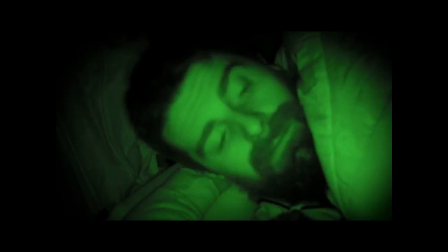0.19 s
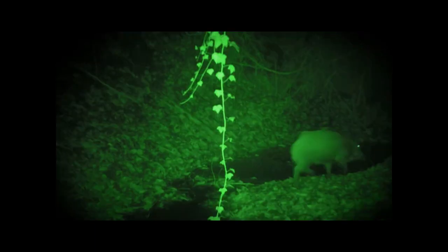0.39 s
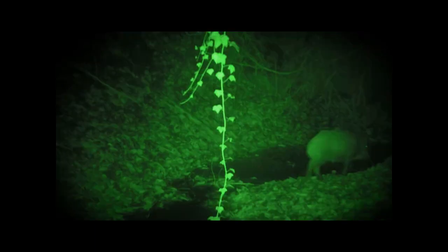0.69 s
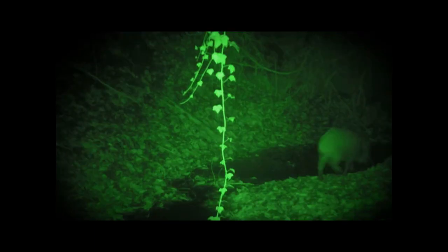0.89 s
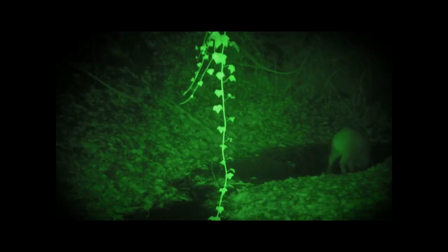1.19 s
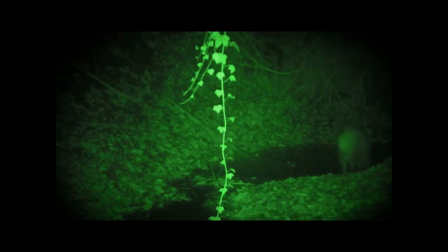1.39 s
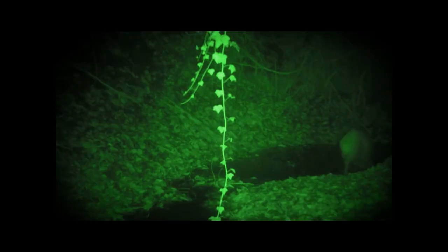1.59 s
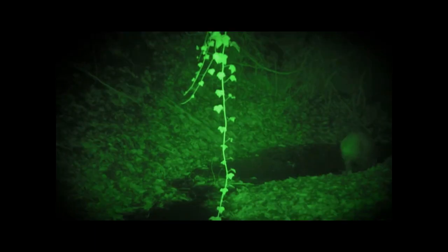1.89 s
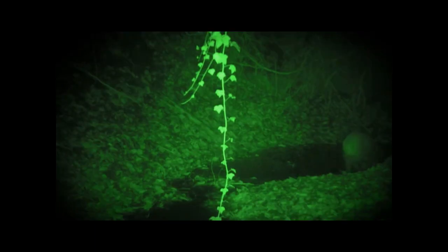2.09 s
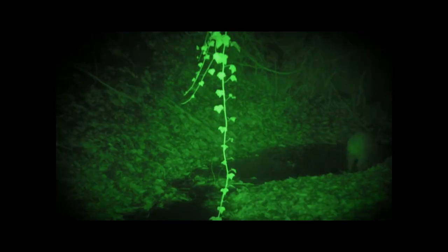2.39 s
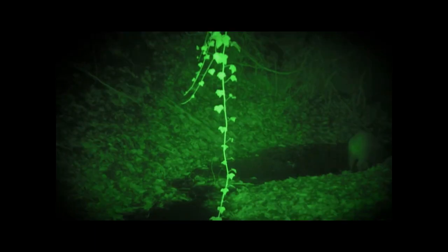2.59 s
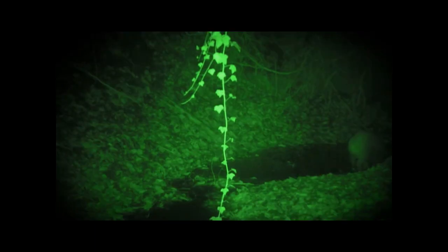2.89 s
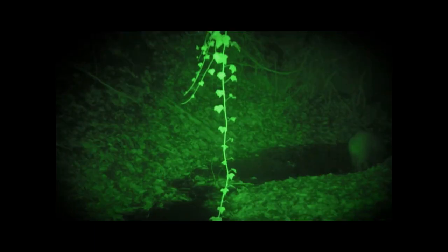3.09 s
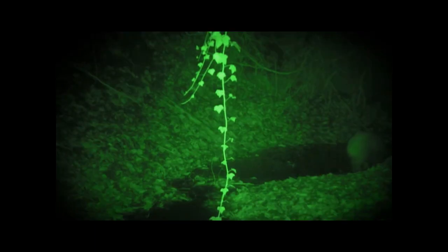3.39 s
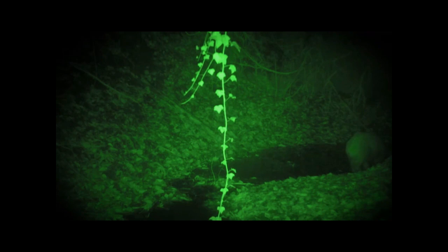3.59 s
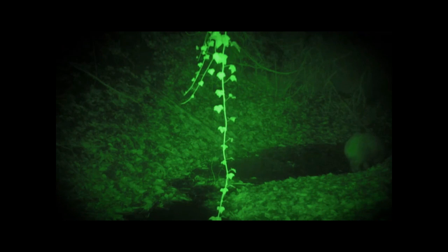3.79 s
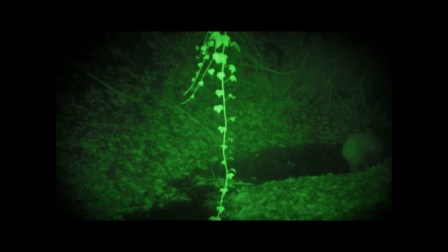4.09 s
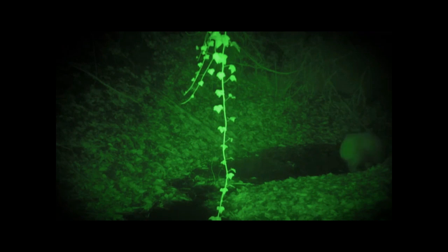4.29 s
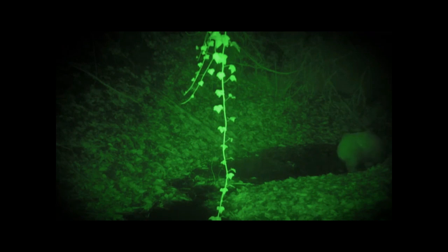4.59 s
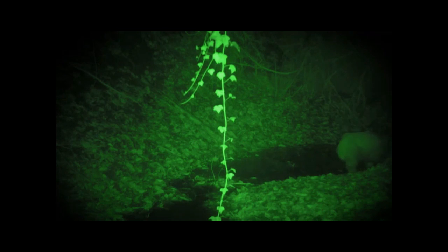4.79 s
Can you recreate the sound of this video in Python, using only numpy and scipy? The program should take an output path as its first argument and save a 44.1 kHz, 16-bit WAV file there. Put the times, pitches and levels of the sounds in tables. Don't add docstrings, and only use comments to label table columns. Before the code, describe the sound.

A boar forages in deep dry leaf litter, heard from a few metres by a camera microphone with little echo. Soft handling ticks come first, then muffled hoof rustles and small thuds, then loud irregular crackles, crushed heaps and snapping twigs. Brief, low closed-throat grunts sit underneath; airy nostril noise follows late. A thin high whine and low night air continue throughout.

```python
import sys
import numpy as np
from scipy import signal
from scipy.fft import rfft, irfft, next_fast_len
from scipy.io import wavfile
from scipy.ndimage import map_coordinates

SR = 44100
rng = np.random.default_rng(int(sys.argv[2]) if len(sys.argv) > 2 else 0)


def generate_wav(signal):
    frames = np.transpose(np.atleast_2d(signal))
    scaled = np.clip(frames, -1, 1) * 32767
    pcm = np.round(scaled).astype(np.int16)
    wavfile.write(sys.argv[1], SR, pcm)


def gain_from_db(level_db):
    decades = np.asarray(level_db, float) / 20
    return 10 ** decades


N = 218293


def unit(x):
    return x / np.sqrt(np.mean(x ** 2) + 1e-20)


def curves(rows):
    s, *cols = np.transpose(rows)
    return [np.interp(np.arange(N) / SR, s, c) for c in cols]


def wobble(rate_hz):
    knots = rng.standard_normal(int(N * rate_hz / SR) + 4)
    return map_coordinates(knots, [np.arange(N) * rate_hz / SR])


def filtered(x, response):
    m = next_fast_len(len(x) + 8192)
    return irfft(rfft(x, m) * response(np.fft.rfftfreq(m, 1 / SR)), m)[:len(x)]


def coloured(x, points):
    point_hz, db = np.transpose(points)
    hz = np.fft.rfftfreq(4096, 1 / SR)
    gain = gain_from_db(np.interp(np.log(hz + 1), np.log(point_hz), db))
    cepstrum = irfft(np.log(gain))
    cepstrum[1:2048] *= 2
    cepstrum[2049:] = 0
    impulse = irfft(np.exp(rfft(cepstrum)))
    return signal.fftconvolve(x, impulse)[:N]


def resonance(hz, width_hz):
    return lambda f: 1j * f * width_hz / (hz * hz - f * f + 1j * f * width_hz)


def rings(events, gain_db):
    out, t = np.zeros(N + SR), np.arange(SR // 10) / SR
    for start_s, peak_db, hz, cycles in events:
        attack = 1 - np.exp(-t * hz * 4)
        ring = np.sin(2 * np.pi * hz * t) * np.exp(-3 * t * hz / cycles) * attack
        out[round(start_s * SR):][:len(t)] += gain_from_db(peak_db + gain_db) * ring
    return out[:N]


# hz, level_db (per Hz)
NIGHT_COLOUR = [(15, -6), (30, -15), (60, -5), (120, -3), (250, -3.5), (500, -43), (900, -120)]


def night():
    rise_db = np.interp(np.arange(N) / SR, [.1, .3], [-5, 0])
    level_db = -64.0 + rise_db + 0.78 * wobble(16)
    return gain_from_db(level_db) * unit(coloured(rng.standard_normal(N), NIGHT_COLOUR))


# time_s, level_db
WHINE_LEVEL = [(0, -75), (.27, -75), (.45, -67), (4.95, -67)]


def whine():
    carrier_hz, field_hz = 7796.2, 59.51
    t = np.arange(N) / SR
    flip = np.tanh(5 * np.sin(np.pi * field_hz * t))
    return np.sqrt(2) * gain_from_db(curves(WHINE_LEVEL)[0]) * flip * np.sin(2 * np.pi * carrier_hz * t)


# start_s, tick_db, thump_db
OPENING_TICKS = [
    (0.231, -33.5, -50),
    (0.2404, -29.5, -31.5),
    (0.25, -42, -52),
]


def opening_ticks():
    out, t = np.zeros(N), np.arange(SR // 25) / SR
    for start_s, tick_db, thump_db in OPENING_TICKS:
        rattle = 0.48 * rng.standard_normal(len(t)) * np.exp(-t / 0.0006)
        spike = -1.6 * np.exp(-t / .00006)
        push = -gain_from_db(thump_db + 9.0) * (1 - t / 0.0064) * np.exp(-t / 0.0006)
        out[round(start_s * SR):][:len(t)] += gain_from_db(tick_db) * (rattle + spike) + push
    burst_db = np.interp(np.arange(N) / SR, [.222, .228, .241, .247], [-90, -40, -39, -90])
    return out + gain_from_db(burst_db) * filtered(rng.standard_normal(N), resonance(600, 1200))


# start_s, length_s, pitch_hz, level_db, width_hz
SNIFFS_AND_RUSTLES = [(4.21, .15, 2180, -47, 120), (4.07, .06, 2150, -48, 110), (4.31, .06, 4000, -58, 200),
                      (4.73, .06, 2160, -52, 110), (4.57, .03, 2500, -46, 200), (4.28, .06, 450, -52, 170),
                      (4.445, .04, 310, -53, 170), (3.55, .05, 340, -48, 170), (4.17, .3, 2250, -46, 1100),
                      (4.55, .3, 2300, -48.5, 1100)]


def sniffs_and_rustles():
    out = np.zeros(N)
    for start_s, length_s, hz, level_db, width_hz in SNIFFS_AND_RUSTLES:
        noise = rng.standard_normal(round(length_s * SR))
        air = filtered(noise, lambda f: resonance(hz, width_hz)(f) ** 2)
        out[round(start_s * SR):][:len(air)] += gain_from_db(level_db) * unit(air) * signal.windows.tukey(len(air), .25)
    return out


# time_s, pitch_hz, level_db
GRUNTS = [
    [(1.785, 80.8, -52), (1.81, 80.7, -41), (1.845, 73.3, -40), (1.885, 63.5, -54)],
    [(2.786, 81.4, -43), (2.824, 84.2, -42.5), (2.855, 84, -39), (2.915, 82, -54)],
    [(4.036, 85, -52), (4.05, 83, -46), (4.09, 73.6, -49), (4.16, 64.3, -50), (4.19, 59.4, -54)],
]
# centre_hz, width_hz, gain_db
THROAT = [(77.5, 21, 0.5), (197, 200, -3), (273, 140, 2.5)]


def grunts():
    def throat(f):
        return sum(gain_from_db(gain_db) * resonance(hz, width_hz)(f) ** 2 for hz, width_hz, gain_db in THROAT)

    out = np.zeros(N)
    for rows in GRUNTS:
        on = slice(round(rows[0][0] * SR), round(rows[-1][0] * SR))
        pitch_hz, level_db = (c[on] for c in curves(rows))
        cycle = np.floor(np.cumsum(pitch_hz * (1 + .03 * wobble(70)[on])) / SR)
        pulse_db = 6 * (cycle % 2) + 1.2 * rng.standard_normal(len(pitch_hz))
        pulses = np.diff(cycle, prepend=0) * gain_from_db(pulse_db)
        breath = .02 * rng.standard_normal(len(pitch_hz))
        voice = filtered(pulses + breath, throat)
        out[on] += gain_from_db(level_db) * unit(voice) * signal.windows.tukey(len(voice), .35)
    return out


# start_s, peak_db, pitch_hz
THUDS = [(.052, -45, 250), (1.79, -29.5, 200), (4.044, -40, 270), (4.07, -47, 250), (4.155, -40, 290),
         (2.822, -32, 350), (1.862, -37, 170), (.503, -23.5, 520), (0.429, -46, 84), (1.02, -48, 100),
         (1.143, -50, 57), (.247, -40, 110), (1.642, -51, 88), (1.715, -36, 480), (1.7, -42, 70),
         (1.8, -39, 280), (2.822, -28, 600), (2.847, -20.5, 570)]


def thuds():
    falls = rings([(s, db, hz, 2.5) for s, db, hz in THUDS], 6.5)
    return filtered(falls, lambda f: (1j * f / (45 + 1j * f)) ** 2)


# start_s, peak_db, pitch_hz, ring_cycles
SNAPS = [(0.364, -23, 1140, 7.3), (1.101, -20, 1110, 2.6), (1.166, -20, 1160, 2.8), (1.39, -19, 1100, 2.5),
         (1.568, -24, 1020, 2.4), (1.715, -13, 1190, 1.5), (1.807, -15, 940, 2.3), (1.823, -17, 1530, 2.4),
         (1.973, -24, 1470, 5.8), (2.025, -22, 990, 2.1), (2.097, -21, 1230, 4.4), (2.229, -15, 2700, 12),
         (2.286, -17, 1290, 4.3), (2.366, -12, 1890, 2.5), (2.393, -18, 1740, 3.1), (2.825, -17, 1650, 3.1),
         (3.011, -15.5, 1560, 1.4), (3.043, -16, 1380, 3.8), (3.412, -6.5, 1580, 2), (3.439, -15, 2080, 4),
         (3.478, -19, 1350, 2.7), (3.598, -16.5, 1560, 4.3), (3.775, -20, 1690, 4.4),
         (4.046, -16.5, 1360, 3.2), (4.401, -19, 885, 3), (4.465, -24, 1440, 2.9)]
# start_s, peak_db, pitch_hz, ring_cycles
TICKS = [(.5005, -16, 1000, 6), (1.8658, -13, 1650, 2.3), (2.8492, -16, 1830, 1.4), (3.2195, -6, 1300, 1.1),
         (3.2625, -14, 2300, 4.5), (4.0695, -14.5, 2020, 2.4), (1.625, -13, 1080, 2),
         (1.891, -49, 12000, 1.5), (1.953, -32, 5000, 3), (1.978, -37, 9500, 1.5),
         (2.017, -25.5, 4700, 2.5), (2.018, -40, 10500, 1.8), (2.112, -29, 12300, 4),
         (2.158, -31, 12300, 4), (2.242, -38, 4600, 3), (2.365, -36, 4900, 3), (2.497, -28, 4500, 3),
         (2.541, -33, 8500, 2.7), (2.561, -37, 10000, 2.5), (2.814, -41, 10000, 2.8),
         (3.107, -34, 10000, 2.3), (3.413, -28, 5130, 7.1), (3.44, -29, 4900, 4), (3.549, -46, 6000, 2.5),
         (3.58, -37, 8300, 10), (3.863, -29, 5870, 10), (4.03, -42.5, 4700, 3), (4.507, -29, 2900, 5.6),
         (3.205, -26, 2290, 30), (.041, -37, 2500, 6.3)]


def snaps():
    def twig_body(f):
        delay = np.exp(-2j * np.pi * f * 0.00125)
        return resonance(1800, 5000)(f) / (1 + 1j * f / 6000) * delay

    twigs = filtered(rings(SNAPS, 3.4), twig_body)
    direct = filtered(twigs + rings(TICKS, 1.9), lambda f: (1j * f / (250 + 1j * f)) ** 2)
    ground_echo = 0.22 * np.pad(direct, (130, 0))[:N]
    return direct + ground_echo


# start_s, peak_db, pitch_hz
CRACKS = [(0.5046, -30, 1060), (0.6587, -26, 1020), (1.4715, -23, 1180), (1.4983, -21, 1560),
          (1.701, -25, 1657), (1.7047, -28, 1640), (1.7883, -18, 1170), (1.8188, -15.5, 1260),
          (1.953, -15, 1750), (2.0497, -26, 1100), (2.1137, -21, 1760), (2.1677, -18, 1700),
          (2.2337, -12, 2000), (2.2376, -8.5, 2100), (2.2485, -12, 1660), (2.2813, -15, 1180),
          (2.3136, -17, 1470), (2.317, -17, 1220), (2.3824, -18, 2070), (2.4108, -15, 1960),
          (2.4249, -9, 2560), (2.4348, -14, 1830), (2.452, -17, 1480), (2.4715, -20, 1600),
          (2.4904, -14.5, 1500), (2.6272, -16, 2420), (2.6833, -16, 1650), (2.7181, -20, 1700),
          (2.7338, -18, 1910), (2.7495, -17, 2220), (2.7831, -18, 2640), (2.8562, -12, 2120),
          (2.8691, -19, 1540), (2.9018, -31, 1950), (2.9415, -19, 2360), (2.9596, -18, 2490),
          (2.9638, -13.5, 2680), (3.0899, -22, 1250), (3.1083, -22, 1850), (3.1168, -25, 1800),
          (3.1207, -24, 1890), (3.2691, -21, 1330), (3.2991, -20, 1450), (3.3161, -21, 2570),
          (3.3451, -13.5, 1550), (3.495, -23, 1540), (3.5055, -24, 1400), (3.5589, -19, 1820),
          (3.5683, -23, 1750), (3.5892, -13, 1780), (3.8266, -20, 1140), (3.8424, -12, 2630),
          (3.856, -24, 1600), (3.864, -24, 1920), (4.0766, -19, 1880), (4.1273, -20, 2320),
          (4.3571, -20, 2500), (4.6311, -18, 1230), (4.6584, -17, 1740), (4.7891, -23, 2330)]
# start_s, peak_db, pitch_hz
CRISPS = [(0.466, -38, 4230), (0.5048, -35, 4080), (0.5087, -33, 4100), (1.0363, -26, 4030),
          (1.1, -32, 4270), (1.4097, -33, 4210), (1.7993, -28, 4160), (1.8183, -29, 4280),
          (2.1024, -29, 4710), (2.1125, -21, 4650), (2.116, -20, 4700), (2.1879, -38, 4120),
          (2.4859, -31, 4294), (2.5012, -23, 4710), (2.5453, -36, 4460), (2.6271, -31, 4316),
          (2.6828, -31, 4030), (2.6913, -28, 4270), (2.7149, -25, 4430), (2.7365, -32, 4370),
          (2.7433, -29, 4480), (2.7653, -34, 4480), (2.7826, -36, 4110), (2.8265, -36, 5050),
          (2.8374, -36, 4210), (2.8502, -15, 4060), (2.8547, -19, 4120), (3.0001, -40, 4160),
          (3.0844, -33, 4660), (3.1097, -23, 4300), (3.1279, -27, 4240), (3.1705, -32, 4720),
          (3.239, -25, 4400), (3.2545, -36, 4140), (3.2796, -38, 4550), (3.3245, -23, 4380),
          (3.3417, -27, 4150), (3.3731, -35, 4330), (3.5689, -34, 4510), (3.5998, -30, 4180),
          (3.6245, -32, 4100), (3.8582, -30, 4190), (3.8937, -35, 4350), (4.0469, -38, 4090),
          (4.4004, -35, 4420), (4.6532, -34, 4120), (4.804, -44, 4550), (4.871, -40, 4320)]
# start_s, peak_db, pitch_hz
SPECKS = [(1.7794, -57, 10960), (1.8243, -53, 10000), (2.0789, -57, 8800), (2.1009, -52, 9670),
          (2.1789, -49, 9650), (2.2588, -46, 9940), (2.4358, -46, 10020), (2.5228, -48, 11290),
          (2.5308, -48, 9570), (2.5963, -53, 9300), (2.7841, -50, 10400), (2.8343, -52, 9010),
          (2.9177, -45, 11570), (3.0425, -57, 8810), (3.0845, -50, 10250), (3.1138, -39, 9920),
          (3.1339, -40, 9900), (3.1506, -47, 11470), (3.4134, -48, 10740), (3.4408, -37, 9720),
          (3.4446, -44, 9670), (3.508, -49, 11150), (3.6273, -51, 9770), (3.7851, -54, 10940),
          (3.9552, -57, 9190), (4.3846, -55, 9800), (4.5081, -44, 9940), (4.6094, -54, 10900),
          (4.8038, -59, 10520), (4.8814, -56, 11330)]


def crackles():
    def family(rows, cycles, gain_db, dull_hz):
        pieces = rings([(*row, cycles) for row in rows], gain_db)
        return filtered(pieces, lambda f: 1j * f / (450 + 1j * f) / (1 + 1j * f / dull_hz) ** 2)

    cracks = family(CRACKS, cycles=3.2, gain_db=3.5, dull_hz=3500)
    crisps = family(CRISPS, cycles=4.2, gain_db=4, dull_hz=6500)
    return cracks + crisps + family(SPECKS, cycles=4.2, gain_db=5, dull_hz=16000)


# start_s, peak_db, centre_hz, t60_s
CRUSHES = [(.328, -27, 795, 0.08), (.362, -17.5, 636, 0.063), (0.446, -25, 1330, .09),
           (.5, -14, 800, 0.071), (.636, -29.5, 816, 0.32), (0.793, -33, 850, 0.091),
           (1.099, -21.5, 1080, 0.091), (1.166, -20, 1150, 0.063), (1.391, -20, 1100, 0.096),
           (1.568, -22, 800, 0.23), (1.7, -23, 1220, 0.12), (1.911, -18.5, 940, 0.06),
           (2.108, -16.5, 1500, 0.11), (2.23, -12, 2410, 0.11), (2.379, -23, 1760, 0.14),
           (2.601, -20.5, 2520, 0.12), (2.47, -16, 1900, 0.13), (2.847, -15.5, 1900, 0.12),
           (2.96, -21, 1450, 0.029), (3.045, -24, 1220, 0.032), (3.219, -14.5, 794, 0.049),
           (3.262, -15.5, 1290, 0.038), (3.412, -11.5, 1500, 0.037), (3.439, -17, 2070, 0.045),
           (3.495, -19, 1480, 0.08), (3.567, -19.5, 1760, 0.12), (3.825, -22, 934, 0.051),
           (3.842, -20, 1410, 0.091), (4.045, -18, 1500, 0.034), (4.651, -18, 1900, 0.04),
           (2.277, -15, 1250, .25)]


def crushes():
    out, t = np.zeros(N + SR), np.arange(SR // 8) / SR
    for start_s, peak_db, hz, t60_s in CRUSHES:
        def heap(f):
            return resonance(hz, .9 * hz)(f) * resonance(1600, 4000)(f) / (1 + 1j * f / 5500) ** 3

        spray = rng.standard_normal(len(t)) * rng.random(len(t)) ** 1.6
        decay = gain_from_db(peak_db - 9 - 60 * t / max(t60_s, .01))
        attack = 1 - np.exp(-t / 0.0008)
        out[round(start_s * SR):][:len(t)] += decay * attack * unit(filtered(spray, heap))
    return out[:N]


def hush():
    dip_db, t = np.zeros(N), np.arange(N) / SR
    for start_s, peak_db, *_ in CRUSHES:
        depth_db = max(7.5 + 4 * peak_db, 0)
        dip_db -= depth_db * np.interp(t - start_s, [-.028, -.012, -.0005, .001], [0, 1, 1, 0], 0, 0)
    return gain_from_db(dip_db)


# time_s, level_db, dryness (0 deep damp layer, 1 brittle top)
LITTER = [(0, -53.5, 0.02), (.21, -56.5, 0.03), (.28, -48, 0.16), (.42, -42, 0.16), (.64, -44, 0),
          (.88, -40, 0.47), (1.3, -46.5, 0.01), (1.7, -45.5, 0.5), (2.03, -42.5, 0.45), (2.2, -44, 0.19),
          (2.6, -36, 0.95), (3.02, -42.5, 0.67), (3.3, -40, 0.68), (3.7, -39, 0.69), (3.96, -42, 0.68),
          (4.3, -45.5, 0.37), (4.55, -45, 0.54), (4.95, -43.5, 0.8)]
# peak_s, peak_db, rise_s, fall_s (each
# over 10 dB), crispness_db
STEPS = [(.238, -39.5, 0.01, 0.0078, -2), (.325, -35.5, 0.063, 0.13, -2.5), (.452, -35, 0.013, 0.049, 1),
         (.476, -32.5, 0.025, 0.014, -5), (0.507, -28.5, 0.0091, 0.018, -1), (.54, -37, 0.063, 0.062, 1),
         (.655, -43, 0.04, 0.044, 1), (.803, -41, 0.01, 0.017, 3), (1.042, -33, 0.028, 0.034, -7),
         (1.105, -32.5, 0.013, 0.04, -1), (1.18, -38.5, 0.016, 0.047, -5), (1.228, -30, 0.044, 0.067, -0.5),
         (1.272, -34, 0.051, 0.04, -7), (1.399, -35, 0.032, 0.087, 1), (1.305, -44, .02, 0.016, -3),
         (1.47, -43, .008, .02, -8), (1.52, -40.5, .015, 0.017, 5), (1.5, -33, 0.036, 0.033, -14),
         (1.596, -30.5, 0.035, 0.045, -4), (1.629, -31.5, 0.036, 0.024, -13), (1.721, -32, 0.07, 0.035, -1),
         (1.81, -30.5, 0.042, 0.051, -10), (1.93, -31.5, 0.048, 0.073, -11)]
# peak_s, peak_db, rise_s, fall_s (each over 10 dB), crispness_db
SHOVES = [(2.105, -34.5, 0.009, 0.024, 13.5), (2.165, -35, 0.028, 0.034, 9), (2.05, -35.5, .015, .015, -3),
          (2.243, -26, 0.011, 0.018, 8), (2.33, -33, .03, .03, -4), (2.29, -26, 0.07, 0.078, -11),
          (2.41, -30, 0.056, 0.073, 7), (2.499, -30.5, 0.028, 0.054, 8), (2.62, -37.5, 0.029, 0.015, 9),
          (2.678, -27.5, 0.013, 0.024, 3.5), (2.706, -29.5, 0.033, 0.04, 9), (2.735, -33, .02, 0.022, 5),
          (2.782, -38, .022, 0.027, 9), (2.91, -38.5, 0.027, 0.017, 12.5), (2.87, -31.5, 0.051, 0.079, 4),
          (2.96, -35, 0.033, 0.035, 2), (3.125, -26, 0.052, 0.055, 3.5), (3.228, -30, 0.015, 0.039, -5),
          (3.27, -31, 0.011, 0.043, -15), (3.34, -27, 0.025, 0.037, 7), (3.444, -37.5, 0.017, 0.035, 12),
          (3.5, -35, 0.032, 0.019, 5.5), (3.09, -38, 0.021, .02, -1), (3.243, -37, .015, .012, 6),
          (3.594, -31, 0.04, 0.036, -2), (3.627, -32.5, 0.054, 0.03, 5.5), (3.89, -39, .02, 0.018, -4),
          (3.785, -33.5, 0.036, 0.037, -5), (3.85, -29.5, 0.045, 0.041, 6), (4.044, -35, 0.022, 0.039, 6.5),
          (4.132, -34, 0.056, 0.068, 2), (4.415, -36, 0.055, 0.066, -0.5), (4.467, -40, .025, 0.039, 9.5),
          (4.62, -37.5, 0.027, .02, 2), (4.654, -30, 0.025, 0.016, 3), (4.69, -38, 0.032, 0.061, -3),
          (4.93, -42, 0.017, .1, 6)]


def effort(settling_db, pushed_db, dry_db, per_crisp):
    roundness = 1.14
    t, (bed_db, dryness) = np.arange(N) / SR, curves(LITTER)
    power = gain_from_db(bed_db + settling_db) ** 2
    for peak_s, peak_db, rise_s, fall_s, crisp_db in STEPS + SHOVES:
        away = np.where(t < peak_s, (peak_s - t) / max(rise_s, .005), (t - peak_s) / max(fall_s, .005))
        push_db = peak_db + pushed_db + per_crisp * crisp_db - 10 * away ** roundness
        power = power + gain_from_db(push_db) ** 2
    return np.sqrt(power) * gain_from_db(dry_db * dryness)


def crackle(colour, clumps, rate_hz, spread_db, hiss):
    when, size, sign = rng.random((3, N))
    sizes = gain_from_db(-abs(spread_db) * np.log(size + 0.0086))
    breaks = (when < rate_hz / SR) * sizes * np.sign(sign - .5)
    bed = unit(breaks) + hiss * rng.standard_normal(N)
    return unit(coloured(bed * clumps * gain_from_db(1.2 * wobble(45)), colour))


def folds(count, hz, cycles, spread_db):
    when, tone, size = rng.random((count, 3)).T[:, :, None]
    k = np.arange(900)
    turns = hz * np.exp(1.665 * (tone - .5)) * k / SR
    envelope = np.exp(-3 * turns / cycles) * (1 - np.exp(-2 * turns))
    ring = gain_from_db(-spread_db * np.log(size + 0.078)) * np.sin(2 * np.pi * turns) * envelope
    places = (when * N).astype(int) + k
    return unit(np.bincount(places.ravel(), ring.ravel(), N)[:N])


# hz, level_db (per Hz)
LARGE_COLOUR = [(60, -58.5), (150, -17.5), (300, -9), (600, -1.5), (900, -1), (1500, -12.5), (3000, -52.5)]
MIDDLE_COLOUR = [(200, -50), (600, -20.5), (1100, 1), (1700, 1), (2600, -3.5), (4000, -15), (8000, -40)]
BRITTLE_COLOUR = [(1000, -54.5), (2300, 2), (3200, 1.5), (4500, -6), (6000, -16.5), (7300, -29.5),
                  (10000, -40)]
DUST_COLOUR = [(3000, -27), (6000, 10), (8000, 2.5), (11000, 3), (14300, -6), (16000, -6)]


def leaves():
    clumps = gain_from_db(0.87 * wobble(30.04) + 0.81 * wobble(110))
    large_gain = effort(settling_db=1.5, pushed_db=-2.5, dry_db=-11, per_crisp=0.07)
    middle_gain = effort(settling_db=0, pushed_db=0, dry_db=0, per_crisp=0)
    brittle_gain = effort(settling_db=-9.5, pushed_db=-8.5, dry_db=0.5, per_crisp=0.65)
    dust_gain = effort(settling_db=-31.5, pushed_db=-33, dry_db=3, per_crisp=1.13)

    large = crackle(LARGE_COLOUR, clumps, rate_hz=500, spread_db=2.0, hiss=1.0)
    large = large + 0.34 * folds(count=700, hz=719.4, cycles=11.5, spread_db=2.0)
    middle = crackle(MIDDLE_COLOUR, clumps, rate_hz=900, spread_db=1.0, hiss=1.0)
    middle = middle + 0.42 * folds(count=1800, hz=1500, cycles=8.8, spread_db=1.5)
    brittle = gain_from_db(3.0) * crackle(BRITTLE_COLOUR, clumps, rate_hz=1000, spread_db=3.5, hiss=1.0)
    curls = .45 * folds(count=700, hz=2500, cycles=18, spread_db=2.5)
    dust = gain_from_db(1.5) * crackle(DUST_COLOUR, clumps ** 0.42, rate_hz=500, spread_db=1.0, hiss=1.3)

    coarse = large_gain * large + middle_gain * middle
    fine = brittle_gain * (brittle + curls) + dust_gain * dust
    return gain_from_db(-2.5) * hush() * (coarse + fine)


def scene():
    surroundings = night() + whine() + opening_ticks()
    boar = sniffs_and_rustles() + grunts() + thuds() + snaps() + crackles() + crushes() + leaves()
    return (surroundings + boar)[None]


def low_pass(x):
    return signal.sosfilt(signal.butter(12, 15280, fs=SR, output="sos"), x)


def record(dry):
    mix = filtered(dry[0], lambda f: gain_from_db(-.2 * np.clip(f - 14450, 0, 400)))[None]
    return low_pass(mix)


dry = scene()
out = record(dry)
generate_wav(out)
```